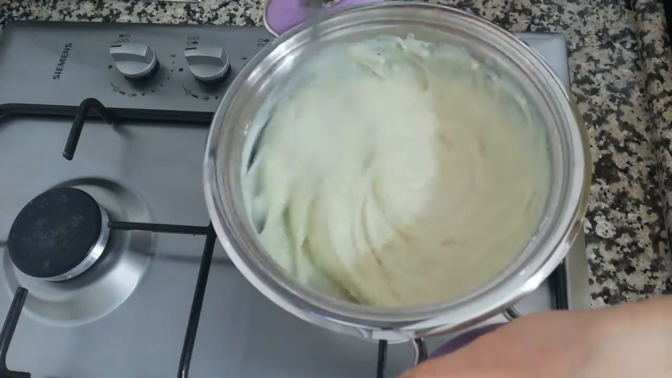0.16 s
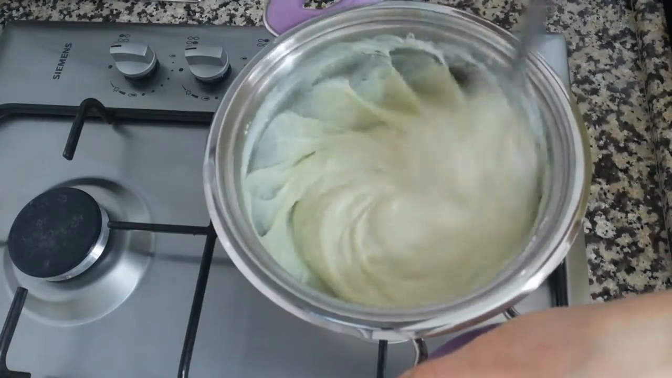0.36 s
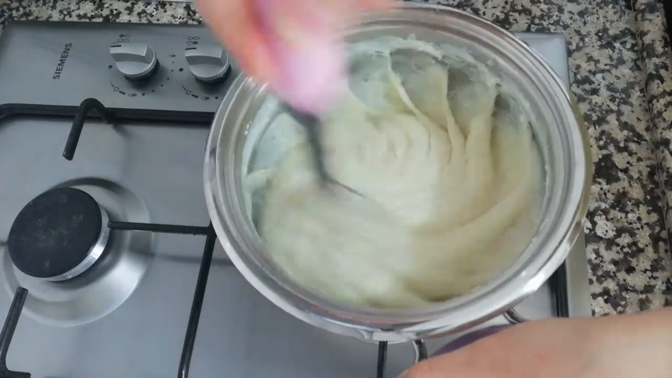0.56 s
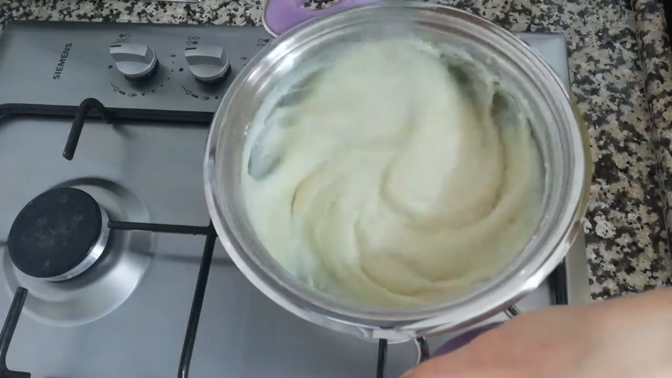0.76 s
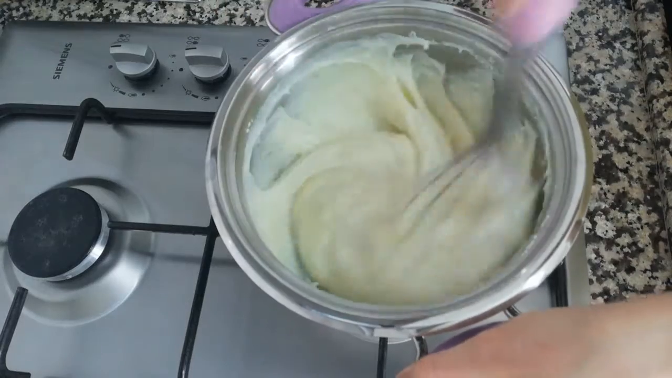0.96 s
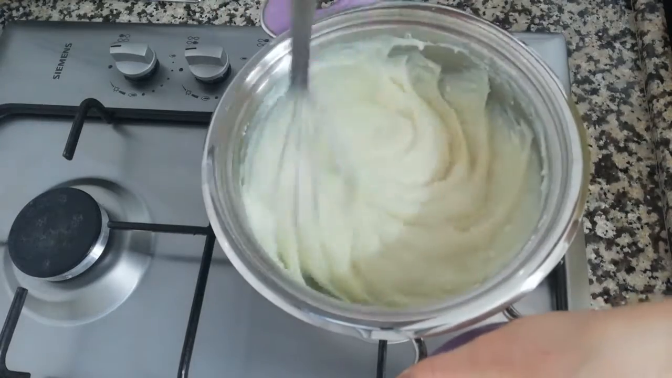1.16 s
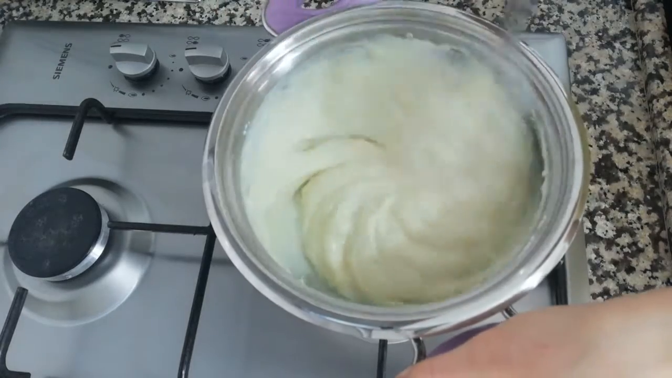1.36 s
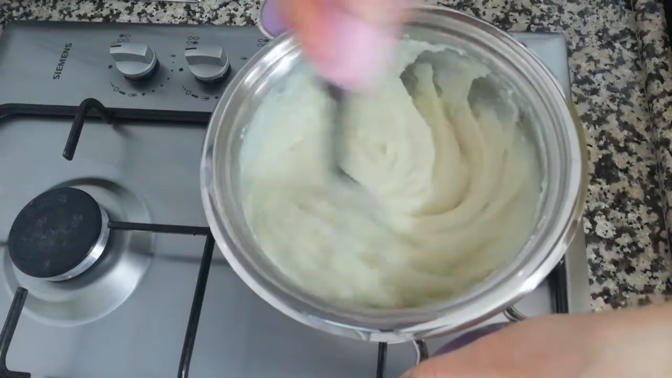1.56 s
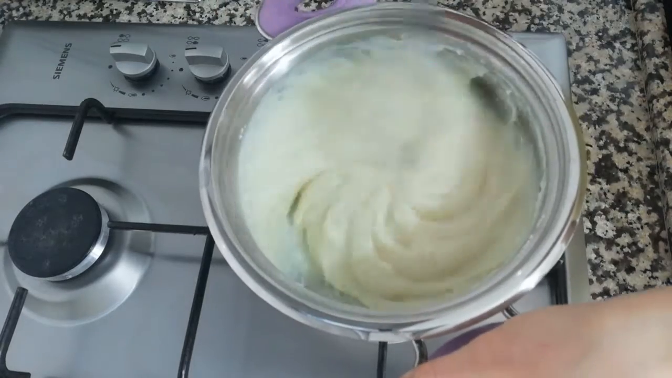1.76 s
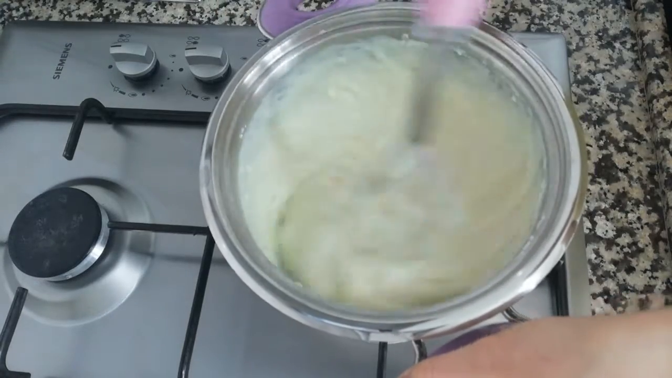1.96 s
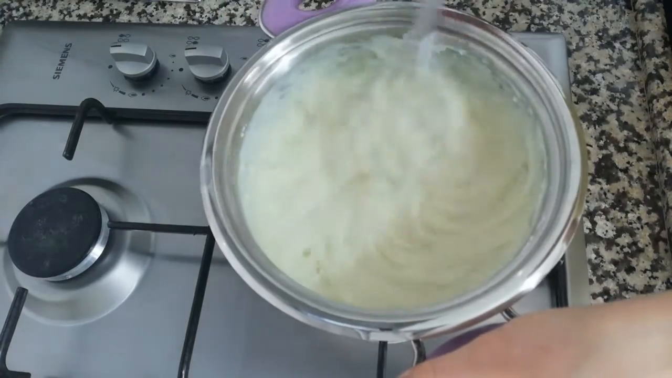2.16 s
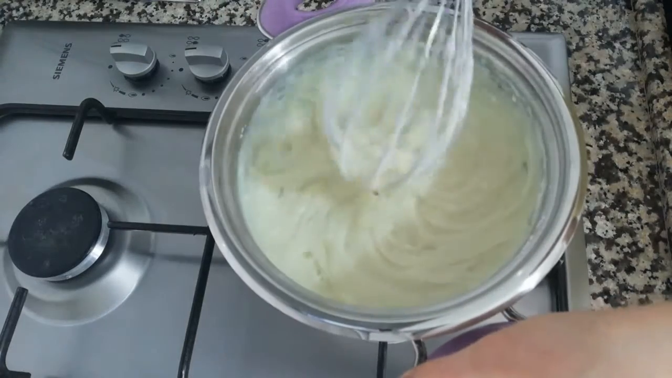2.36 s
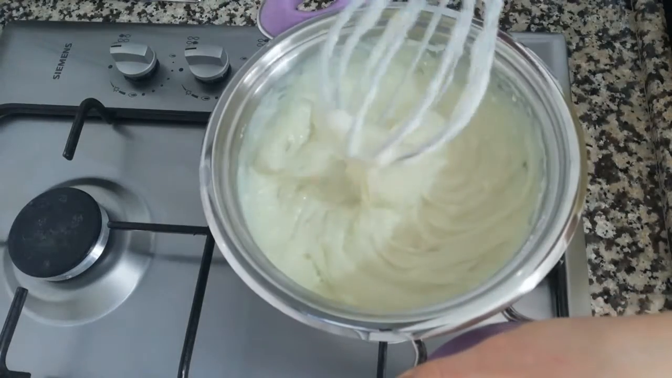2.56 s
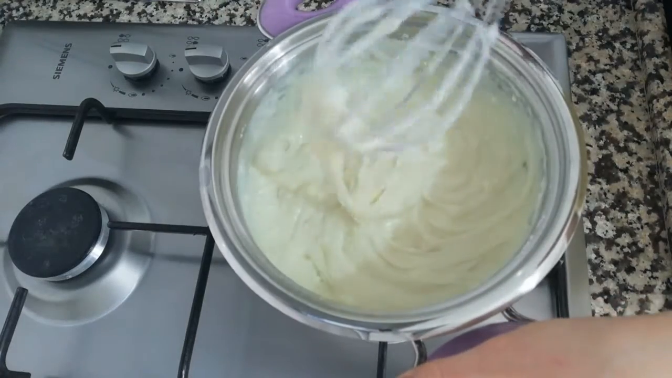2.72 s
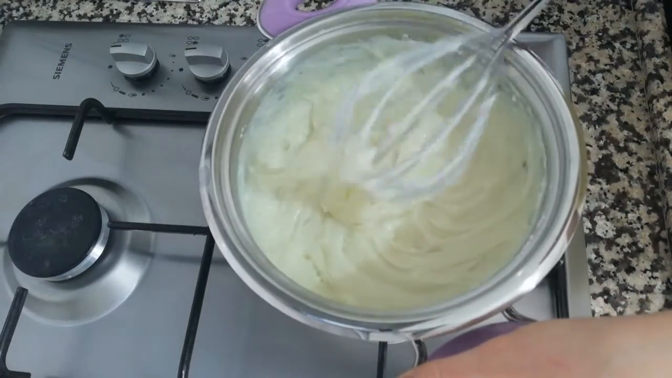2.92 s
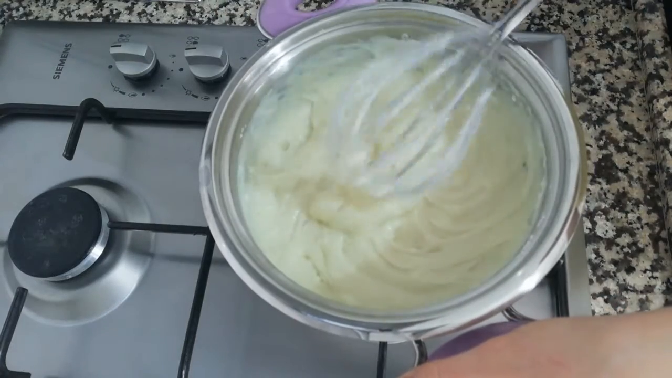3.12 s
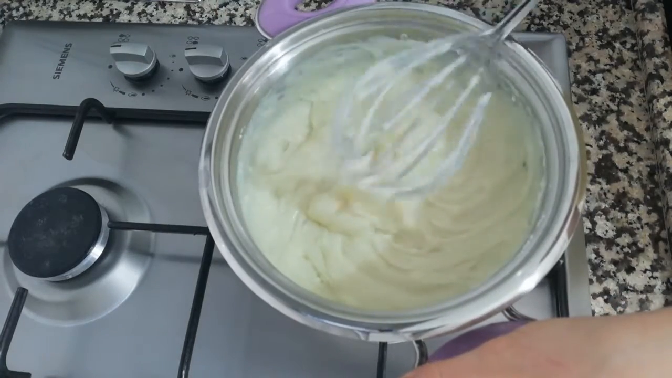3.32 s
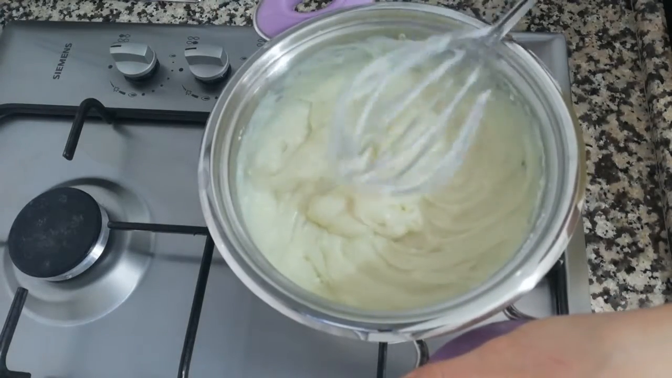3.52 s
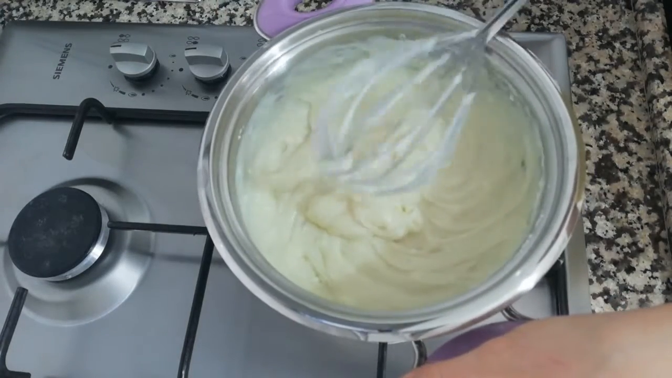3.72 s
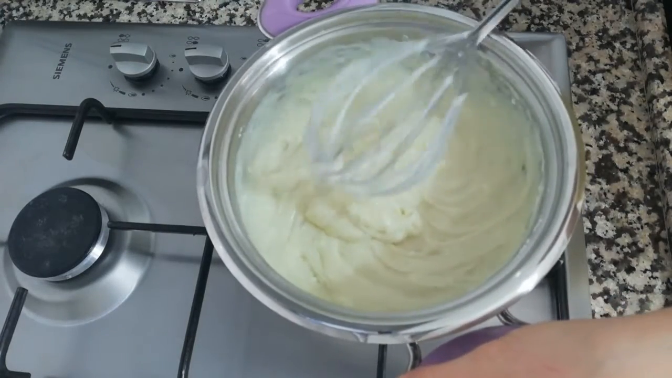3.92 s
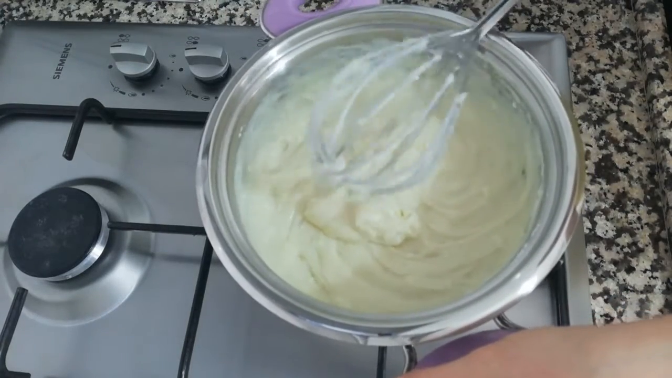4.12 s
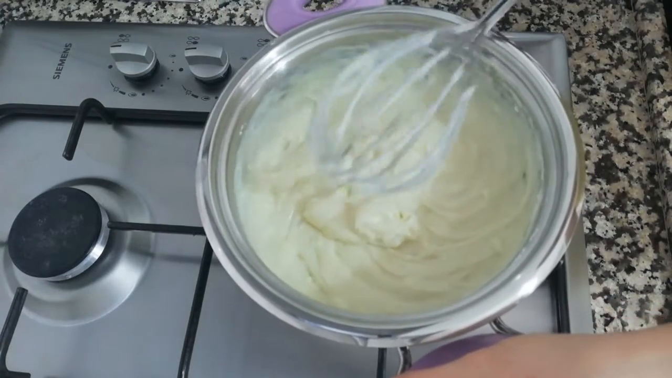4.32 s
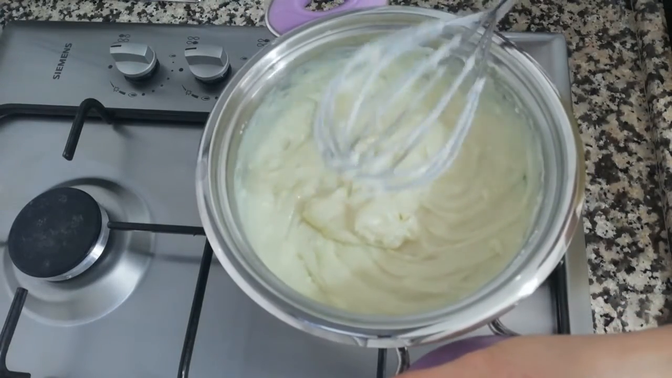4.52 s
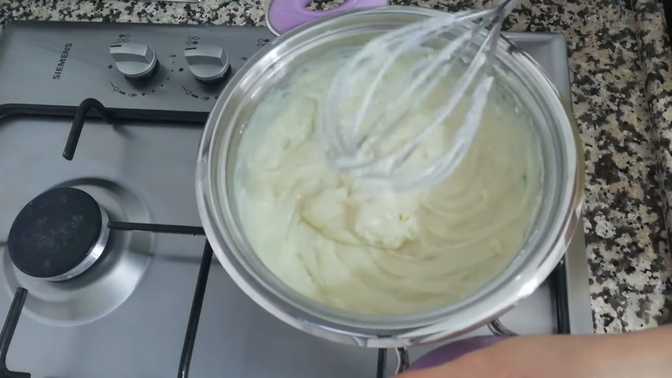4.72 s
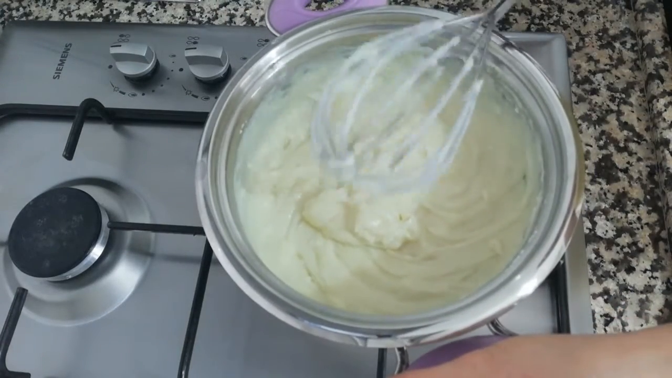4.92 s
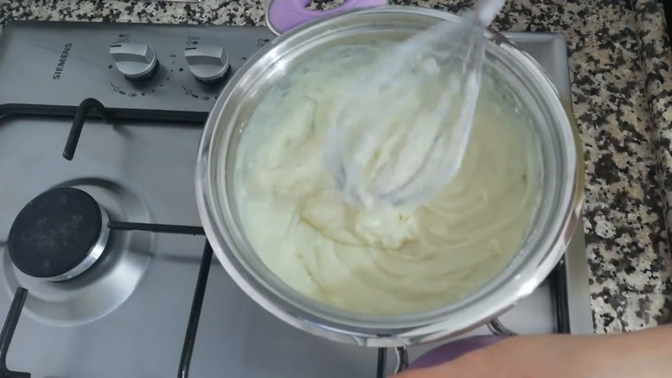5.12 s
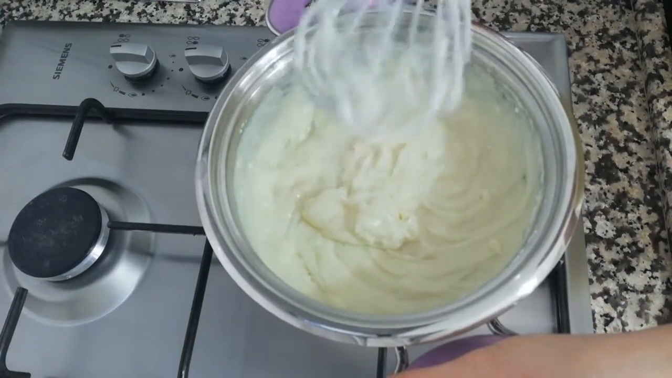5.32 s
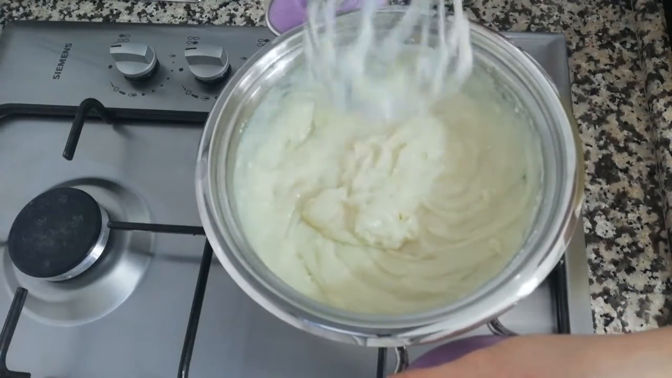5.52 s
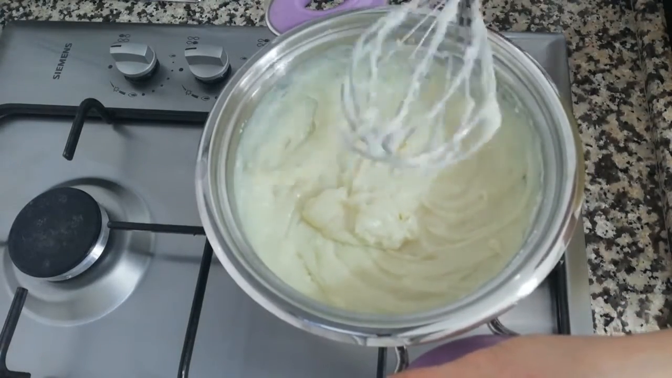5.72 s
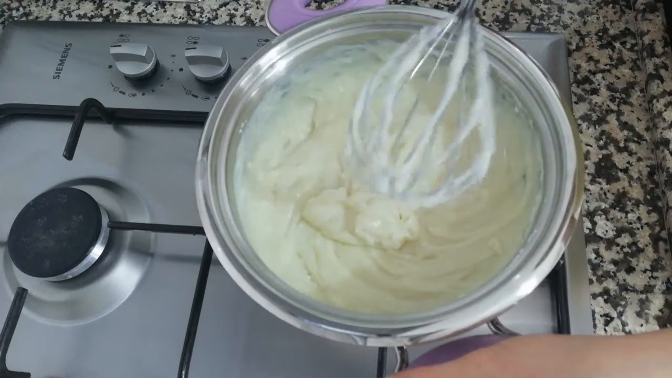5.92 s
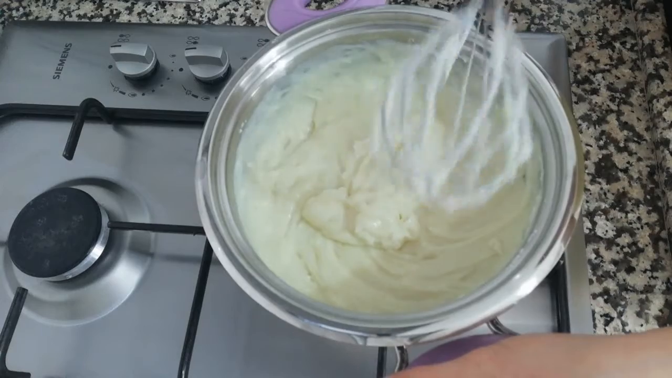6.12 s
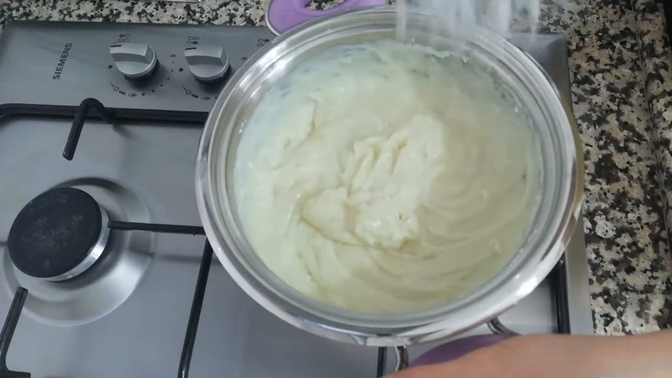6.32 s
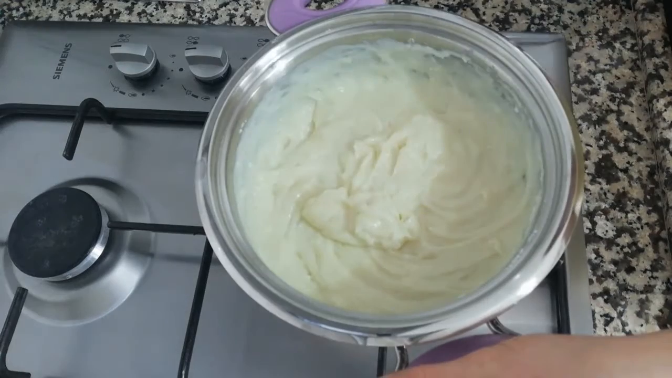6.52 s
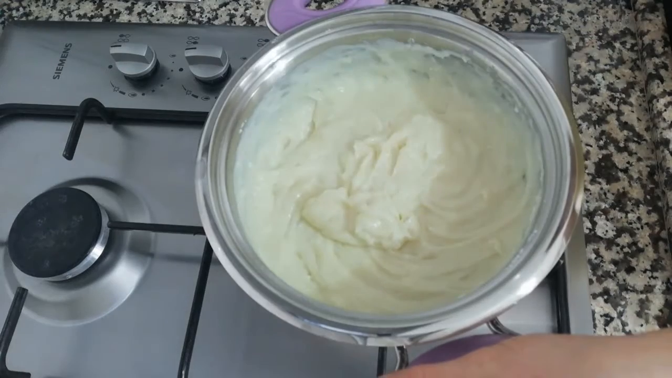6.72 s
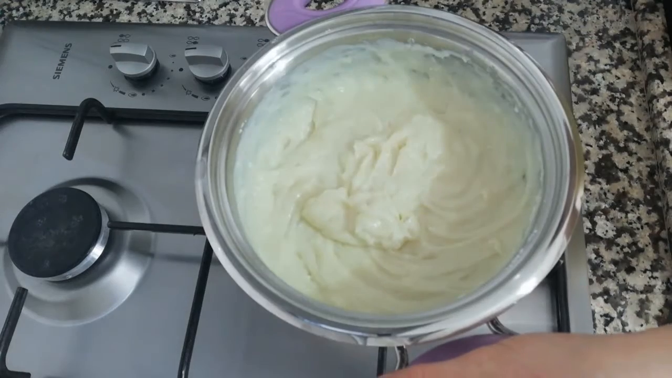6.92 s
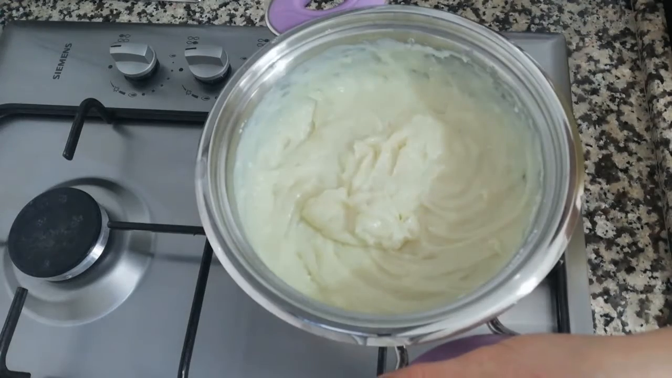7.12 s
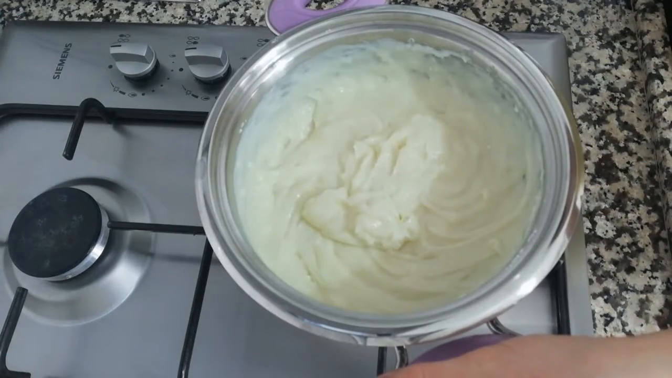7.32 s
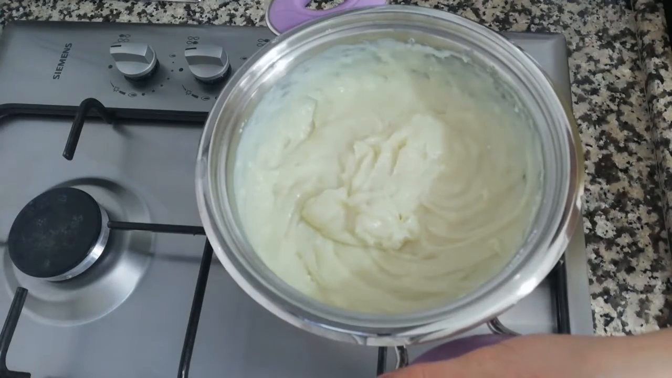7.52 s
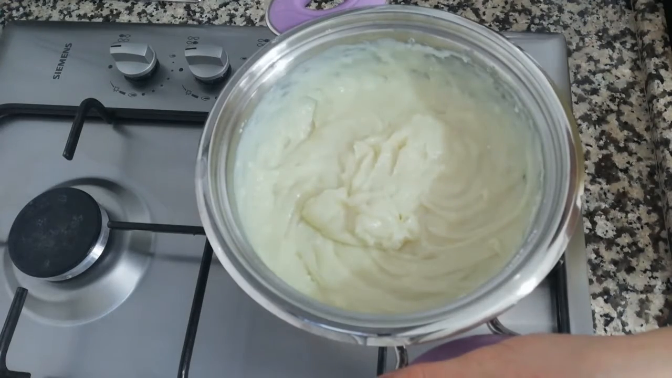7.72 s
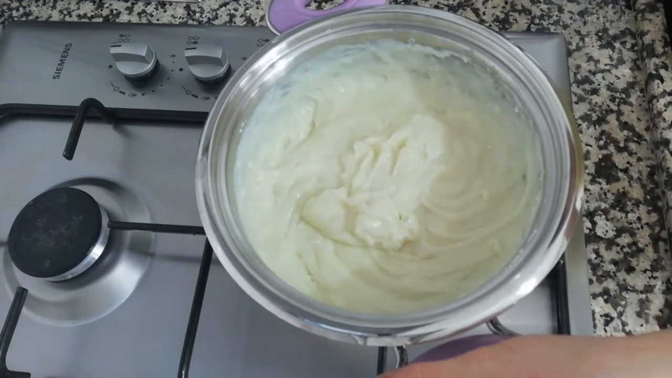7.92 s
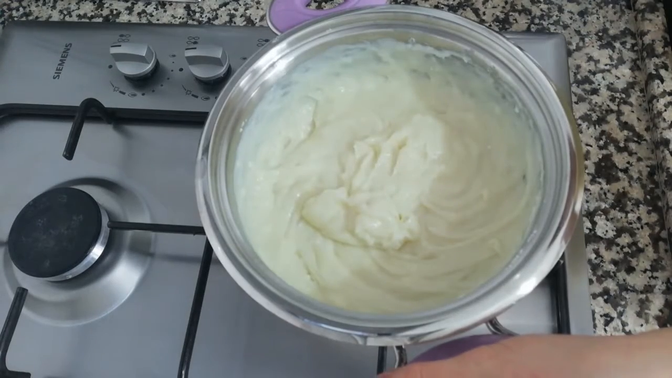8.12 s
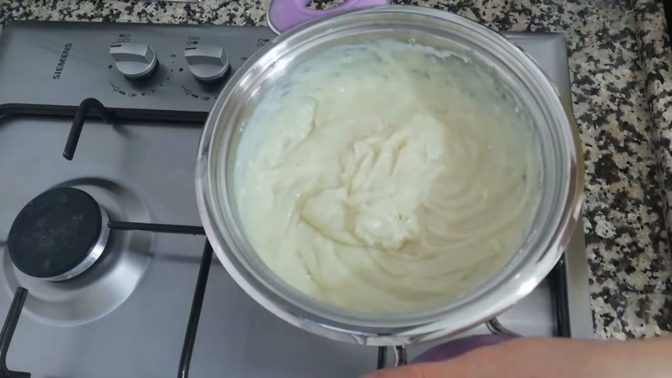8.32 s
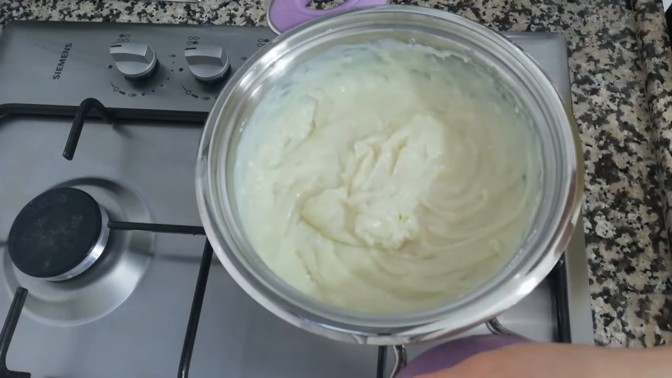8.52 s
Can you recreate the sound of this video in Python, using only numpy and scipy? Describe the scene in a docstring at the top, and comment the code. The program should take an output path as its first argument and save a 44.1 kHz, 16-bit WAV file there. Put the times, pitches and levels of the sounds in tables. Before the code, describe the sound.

Brisk wet whisking with scratchy wire sweeps in a metal pot, a pause, a run of sharp ringing taps on the rim, then small clacks.

```python
"""A small quiet kitchen: a wire whisk stirs thick pudding in a steel pot on a gas hob.
Its wires scrape the steel as noisy slips that excite spectra and resonances; air pockets plop as rising sines.
It is rapped on the rim sixteen times: inharmonic steel modes and buzz, then low hob modes, clunk and rattle.
Soft bumps accompany the stirring; small knocks and light rubs of filtered noise follow as it is put aside.
Behind lie a diffuse noise-tail reverb and still air with a low wavering hum."""
import sys
import numpy as np
from scipy import signal
from scipy.fft import rfft, irfft, next_fast_len
from scipy.io import wavfile

SR = 44100
rng = np.random.default_rng(int(sys.argv[2]) if len(sys.argv) > 2 else 0)


def unload_wav(signal):
    """Save mono or channel-first audio to the path in sys.argv[1] as 16-bit WAV at rate SR, clipped to [-1, 1]."""
    wavfile.write(
        sys.argv[1],
        SR,
        np.round(np.clip(np.atleast_2d(signal).T, -1, 1) * 32767).astype(np.int16),
    )


N = 382347
TIME = np.arange(N) / SR   # s

# Levels of events and layers are relative: the faders in the functions set the final mix.
# light ticks of wires catching and springing free: t/s, level/dB
CATCHES = [(0.1638, -16.5), (0.3094, -13), (0.4446, -18), (0.5008, -16.5), (0.5364, -27), (0.6494, -17),
           (0.8235, -16), (1.0344, -19), (1.1134, -16), (1.4755, -21.5), (1.511, -14), (8.034, -38.5),
           (8.327, -32.5), (8.4, -28.5)]
# sweeps of the wires along the steel: start t/s, length/s, wire hiss level/dB, pot wall ring level/dB
SWEEPS = [(0.036, 0.083, -43.5, -41.5), (0.12, 0.22, -33.5, -36.5), (.415, 0.049, -33.5, -35.5),
          (0.469, 0.23, -32.5, -29.5), (0.731, 0.1, -32.5, -34), (0.915, 0.24, -31, -32),
          (1.213, .16, -36.5, -36), (1.419, 0.018, -36, -40), (1.471, 0.19, -32.5, -31),
          (1.702, 0.097, -36.5, -37.5)]
SWEEP_ATTACK_S, SWEEP_T60_S = 0.01, 0.052
HISS_ARCH_DB, WALL_ARCH_DB = 5, 7.0   # the wires press hardest in mid-sweep: the ends are this much weaker
# the wires keep grazing the bottom under the first sweeps
GRAZE_S, GRAZE_HISS_DB, GRAZE_WALL_DB = 1.2, -40.5, -43.5
STIR_S = 1.85   # span of the wire notes
# churning of the pudding: t/s, level/dB
CHURN_LEVEL = [(0.0, -61.5), (0.32, -56.5), (0.388, -64), (0.594, -55), (0.948, -64.5), (1.226, -47.5),
               (1.574, -56.5), (1.682, -53), (1.86, -67)]
# the pot drags on the grate: level at heavy churning, and dB of drag per dB of churning
HEAVY_CHURN_DB, DRAG_DB, DRAG_GROWTH = -49.5, -56, 2.7
# larger air pockets opening behind the wires: t/s, level/dB, starting pitch f/Hz
PLOPS = [(0.171, -43, 844), (0.292, -38.5, 930), (0.323, -37.5, 887), (0.537, -36.5, 867),
         (0.6, -40.5, 1140), (0.628, -45, 814), (0.803, -42.5, 964), (1.002, -41, 980), (1.066, -37, 890),
         (1.118, -37, 860), (1.146, -39.5, 780), (1.586, -39, 806)]
# smaller pockets open at random, with this spread of pitch
SMALL_PLOP_DB, SMALL_PLOP_HZ, SMALL_PLOP_OCTAVES = -48, 898, 0.1

# whisk on the rim: t/s, landing, ring level/dB, brightness/(dB per octave), shove to the pot level/dB
RAPS = [(2.9646, "wires", -22.5, 0.5, -42.5), (3.1901, "wires", -26.5, 1.7, -45),
        (3.3879, "wires", -21.5, 0, -41.5), (3.5893, "wires", -21, .5, -41.5),
        (3.7947, "neck", -20.5, 0.5, -40), (3.998, "neck", -23, .3, -40.5), (4.18, "neck", -20, -4, -39),
        (4.3676, "neck", -21, -0.5, -42.5), (4.555, "neck", -23, -1, -43.5),
        (4.7387, "neck", -24, -0.7, -43), (4.9191, "neck", -24.5, 2.5, -43),
        (5.1059, "neck", -22, -1.2, -39.5), (5.7266, "glancing", -26, -3.5, -50),
        (5.9138, "glancing", -26, 0, -43), (6.0731, "glancing", -26.5, 0.1, -44.5),
        (6.2974, "glancing", -25, -0.8, -57)]
# registers of the ring: low f/Hz, high f/Hz
RING_BANDS = [(2500, 3400), (3400, 5300), (5300, 8000), (8000, 11500), (11500, 17000)]
# the pot radiates each register in its own direction: left over right level/dB
RING_LEFT_DB = (1.9, 3, 3, 1.2, 4)
# colour of the ring for each landing: level/dB in each register
RING_COLOUR = {"wires": (-1.5, -2, 0.2, 4.0, -10.5), "neck": (-9, -12.5, 0.14, -1.3, -3),
               "glancing": (-4, -2, -0.1, -1, -10.5)}
# contact tick for each landing: level/dB over the ring
TICK_DB = {"wires": 14, "neck": 21, "glancing": 27.5}
# rocking of the pot for each landing: level/dB at a firm shove
ROCKING_DB = {"wires": -41.5, "neck": -49, "glancing": -44.5}
FIRM_SHOVE_DB, ROCKING_GROWTH = -41.5, 1.6   # growth is dB of rocking per dB of shove
# wall note of the pot for each landing: level/dB over the shove
WALL_NOTE_DB = {"wires": -14, "neck": -15.5, "glancing": 6}
# wall modes of the pot, rung mostly by glancing raps: f/Hz, level/dB, T60/s, delay t/s
WALL_MODES = [(1444, 0.5, .061, .002), (620, -8.5, 0.14, 0.02)]
# rebounds after a rap: delay t/s, pot clunk level/dB, wire rattle level/dB
ROCKING = [(.002, -11.5, 0), (.019, 3.5, -1.5), (0.043, -3.5, -11.5), (.087, -7.5, -9.5)]
RATTLE_DB = -1   # rattle and thock over the shove
# wires lying on the rim are stilled sooner than those swinging free: rattle fade/(dB per s) for each landing
RATTLE_FADE_DB_PER_S = {"wires": 76, "neck": 1.5, "glancing": 84.5}
# hob top under the pot: f/Hz, level/dB, T60/s
HOB = [(39.8, 1.5, 0.74), (49.87, 0, 1), (83, -3, 0.94), (99.5, -4.5, 0.41), (126, -8, 0.57),
       (132.7, -5.5, 0.44), (149.5, -5.5, 0.75), (172.5, 0.5, 0.26), (195, -10.5, 0.41),
       (251.2, -10.5, 0.059), (293, -9, 0.13), (378, -29, 0.43), (432, -12, .45)]

# dull bumps of pot and hob: t/s, thud level/dB, knock level/dB
BUMPS = [(0.248, -49, -51.5), (0.782, -70, -52.5), (1.311, -47, -49), (1.499, -52.5, -53),
         (7.469, -41.5, -56), (7.492, -56.5, -67), (8.327, -47, -57.5)]
# small knocks as things are moved and set down: t/s, level/dB
CLACKS = [(2.395, -48), (6.921, -46), (6.948, -47), (7.031, -36), (7.055, -29.5), (7.515, -38.5)]
# light rubs: start t/s, length/s, hiss level/dB, metal slide level/dB, body level/dB
RUB_STROKES = [(7.367, 0.03, -66.5, -65, -64), (7.432, 0.042, -63, -53, -70), (7.503, 0.039, -93, -88, -52),
               (7.79, .09, -87, -88, -60.5), (7.889, 0.08, -70, -82, -62), (8.012, 0.093, -71, -64.5, -79),
               (8.367, 0.047, -57, -78, -67), (8.406, 0.092, -57.5, -80, -63.5)]
RUB_ATTACK_S, RUB_T60_S, RUB_SAG_DB_PER_S = 0.019, 0.097, 47

# spectrum of wires on steel: f/Hz, level/dB
WIRE_HISS = [(3240, -59), (5500, -4), (7420, 0), (9200, 7.5), (10700, 7.5), (15200, -13.5), (16200, -92),
             (16500, -51)]
# spectrum of the scraped pot wall: f/Hz, level/dB
WALL_RING = [(1290, -27), (2200, -9.5), (2580, -8), (2960, 1), (3210, -3.5), (3590, 4), (4350, 1),
             (4590, 1.5), (7000, -19), (9100, -35), (15400, -120)]
# spectrum of churning pudding: f/Hz, level/dB
CHURN = [(100, -16), (280, -12), (400, -4.5), (700, -1), (1050, 1), (1500, 2), (2400, 2.5), (3000, -7),
         (4000, -5), (6600, -70)]
# spectrum of the buzz in a rap: f/Hz, level/dB
CRACK = [(900, -48), (2300, -20), (2900, -12.5), (3700, -7.5), (5100, -21.5), (6100, 4.5), (8000, -4.5),
         (10300, 5), (11200, -1), (12400, 9.5), (14800, -1.5), (16500, -20)]
# spectrum of a small knock: f/Hz, level/dB
CLACK = [(210, -39), (350, -7), (801, 0.5), (1290, -4.5), (1630, 0.5), (3730, -12), (4330, -14),
         (5480, -23), (9060, -11.5), (12000, -24), (15600, -61), (22000, -120)]
# spectrum of the rubbing hiss: f/Hz, level/dB
RUB_HISS = [(880, -52), (1500, -14), (1930, -8), (2600, -13.5), (4260, -13), (9500, -1.5), (14900, -3),
            (15900, -15), (16500, -36)]
# spectrum of the still air: f/Hz, level/dB
AIR = [(12, -42), (20, -4), (96, -3.5), (165, -13), (351, -15), (440, -14.5), (506, -20.5), (729, -16),
       (2310, -21), (3140, -22), (3420, -21.5), (7950, -27.5), (10500, -26), (15200, -35.5), (16500, -51)]
AIR_DB = -61.5

# resonances of pot and whisk: f/Hz, width/Hz, level/dB
STEEL = [(2704, 16, -5), (2870, 48, -1.5), (3140, 36, -6), (3350, 38, -10), (3554, 71, -16),
         (3674, 130, -12.5), (4285, 23, -12), (4730, 37, -17.5), (5970, 15, -19), (5760, 14, -5),
         (6070, 46, 3.5), (6500, 120, -1.5), (6630, 250, -4), (7140, 61, -7), (7970, 90, -9.5),
         (7940, 40, -27.5), (8720, 200, 0), (9500, 350, -2.5), (10300, 52, 9.5), (10600, 80, 2),
         (11950, 90, -1.5), (12320, 62, 6.5), (13500, 180, -3), (14320, 160, 3.5), (15520, 100, -9)]
# resonances of the hollow of the pot: f/Hz, width/Hz, level/dB
POT_HOLLOW = [(840, 71, 3.5), (890, 114, 17.5)]
# resonances of the grate under the dragging pot: f/Hz, width/Hz, level/dB
GRATE_DRAG = [(146, 11, 0.5), (197, 14, 6.5), (236, 8.8, 2), (340, 17, 1)]
# resonances of the rocking pot: f/Hz, width/Hz, level/dB
POT_CLUNK = [(257.7, 10, -5.5), (320, 40, -1.5), (372.7, 47, 5.5), (436.4, 14, 3.5), (537, 97, 1),
             (616, 37, 3), (793, 39, 0), (865, 50, -2)]
# resonances of the rattling wires: f/Hz, width/Hz, level/dB
WIRE_RATTLE = [(1920, 370, -9), (1924, 120, 1.5), (2290, 130, -6), (3200, 450, 2), (4040, 980, -3.5),
               (9400, 1800, -3)]
# resonances of a dull thud: f/Hz, width/Hz, level/dB
THUD = [(146, 92, 1), (168, 33, 12), (228, 83, -12)]
# resonances of a dull knock: f/Hz, width/Hz, level/dB
KNOCK = [(384, 19, 6), (507, 250, -9.5), (650, 380, -3.5)]
# resonances of what is set down: f/Hz, width/Hz, level/dB
CLACK_RING = [(633, 110, 6.5), (796, 43, -48), (1140, 70, -2), (1780, 84, -2), (1922, 120, -1),
              (2900, 98, 0), (3210, 45, -21), (4210, 57, 6), (6840, 80, -15), (7600, 120, -16)]
# resonances of sliding metal: f/Hz, width/Hz, level/dB
METAL_SLIDE = [(4040, 260, -4), (4400, 120, -5), (6770, 200, -7), (7530, 170, -1.5), (9050, 350, -12),
               (11800, 600, -6)]
# resonances of the rubbed body: f/Hz, width/Hz, level/dB
RUB_BODY = [(462, 12, 0.5), (650, 120, -11), (974, 83, -4), (1340, 20, -3)]

# likeness of the left and right channels: f/Hz, likeness from 0 to 1
LIKENESS = [(60, 0.91), (150, 0.95), (300, 0.12), (700, .15), (2000, .15), (10000, 0.017)]
# reverberation of the kitchen: f/Hz, T60/s
KITCHEN = [(150, 0.82), (600, 0.39), (3000, 0.4), (6000, 0.34), (10000, 0.29), (16000, 0.13)]
CUTOFF_HZ = 16800


def stirring():
    """Wires stick and slip over the steel, ringing wall and hollow, while the pudding churns."""
    hiss, wall = wire_contact()
    churn, = gains_in_time(CHURN_LEVEL)
    passing = from_db(0.86 * drift(41))   # wire after wire touches down
    slips = friction(per_s=500, spread_db=6.0, smooth=1.0) * passing
    scrape = rms_one(slips) + from_db(-0.5) * wire_notes() * passing
    wires = from_db(-3.5) * hiss * coloured(scrape, WIRE_HISS)
    catches = from_db(-11.5) * blows(CATCHES, t60=0.063) * coloured(noise(), WIRE_HISS)

    wall_hiss = from_db(-9.0) * coloured(scrape, WALL_RING)
    steel_ring = from_db(-23.0) * resonate(slips, STEEL)
    pot = wall * (wall_hiss + steel_ring)
    hollow = from_db(-23.5) * hiss * resonate(slips, POT_HOLLOW) + from_db(12) * plops()
    squelch = friction(per_s=500, spread_db=4.5, smooth=1.0)
    pudding = from_db(3.5) * churn * coloured(squelch, CHURN)
    drag_gain = from_db(DRAG_DB) * (churn / from_db(HEAVY_CHURN_DB)) ** DRAG_GROWTH
    drag = drag_gain * resonate(noise()[0], GRATE_DRAG)
    return (wires + catches) * pan(-0.047) + (pot + hollow + pudding + drag) * pan(1.0)


def wire_contact():
    """Gains of wire hiss and wall ring: light grazing, and an arch of pressure in each sweep."""
    graze = stroke(0, GRAZE_S, SWEEP_ATTACK_S, SWEEP_T60_S)
    hiss = from_db(GRAZE_HISS_DB) * graze
    wall = from_db(GRAZE_WALL_DB) * graze
    for start, length, hiss_db, wall_db in SWEEPS:
        touch = stroke(start, length, SWEEP_ATTACK_S, SWEEP_T60_S)
        slack = 1 - np.sin(np.pi * np.clip((TIME - start) / length, 0, 1))
        hiss = np.maximum(hiss, touch * from_db(hiss_db - HISS_ARCH_DB * slack))
        wall = np.maximum(wall, touch * from_db(wall_db - WALL_ARCH_DB * slack))
    return hiss, wall


def wire_notes(per_s=900, t60=0.065, size=3000):
    """Each touch stops a wire at a new length, so it rings briefly at a pitch of its own."""
    count = int(per_s * STIR_S)
    out = np.zeros((2, N))
    shape = dying(t60, size) * (1 - dying(0.014, size))
    for when, pitch, left, right in rng.random((count, 4)):
        hz = 2000 + 14000 * pitch
        cycles = hz * TIME[:size] + np.array([[left], [right]])
        add(out, when * STIR_S, shape * np.sin(2 * np.pi * cycles))
    return out / np.std(out[:, :int(STIR_S * SR)])


def plops(t60=0.028, glide=0.63, size=4000, count=10):
    """An air pocket rings in the hollow of the pot, rising a little as it opens."""
    out, t = np.zeros((2, N)), TIME[:size]
    times = (np.arange(count) + rng.random(count)) / count * SWEEPS[-1][0]
    pockets = list(PLOPS)
    for s in times:
        hz = SMALL_PLOP_HZ * 2 ** (SMALL_PLOP_OCTAVES * rng.standard_normal())
        pockets.append((s, SMALL_PLOP_DB, hz))
    shape = dying(t60, size) * (1 - dying(0.027, size))
    for s, db, hz in pockets:
        phase = 2 * np.pi * hz * t * (1 + glide * t) + rng.normal(0, 1.0, (2, 1))
        add(out, s, from_db(db) * shape * np.sin(phase))
    return out


def raps(size=6000):
    """The landing colours the ring; each rap's own brightness tilts it towards high or low registers."""
    out = np.zeros((2, N))
    octaves = np.log2(RING_BANDS).mean(1)
    for s, landing, ring_db, brightness, shove_db in RAPS:
        levels = ring_db + np.array(RING_COLOUR[landing]) + brightness * (octaves - octaves.mean())
        struck = rim_ring(size)
        ring = 0
        for db, left_db, edges in zip(levels, RING_LEFT_DB, RING_BANDS):
            ring = ring + from_db(db) * pan(left_db) * rms_one(band(struck, *edges))
        tick = dying(0.0013, size) * rms_one(band(noise(size), 5700, 14000, order=1))
        tick = from_db(ring_db + TICK_DB[landing]) * tick
        # the pot wall gives way
        thock = dying(0.1, size) * rms_one(band(noise(size), 1200, 2600, order=2))
        thock = from_db(shove_db + RATTLE_DB) * thock
        contact = from_db(-13.0) * tick + from_db(-5.0) * thock
        add(out, s, from_db(-11.5) * ring + contact * pan(3.2))
    return out


def rim_ring(size, t60_times_width=1.7, scatter_db=2.5, detune=.007, spread_s=0.0019):
    """Steel modes damped by the pudding, with the buzz of several wires landing within milliseconds."""
    hz, width, db = np.transpose(STEEL)[:, :, None]
    hz = hz * (1 + detune * rng.standard_normal(hz.shape))
    strength = from_db(db + scatter_db * rng.standard_normal(db.shape)) * width
    phase = rng.uniform(0, 2 * np.pi, (2,) + hz.shape)
    swell = 1 - np.exp(-TIME[:size] * hz / 6)   # low bending waves take longer to spread round the pot
    tone = np.sin(2 * np.pi * hz * TIME[:size] + phase)
    modes = (strength * swell * dying(t60_times_width / width, size) * tone).sum(1)

    contacts = ((1 + from_db(-3.5)) * dying(0.06, size))[None]
    for lag in rng.exponential(spread_s, size=3):
        add(contacts, lag, from_db(-12.5) * dying(0.034, size)[None])
    buzz = coloured(noise(size), CRACK) * contacts
    return rms_one(modes) + from_db(-3.0) * rms_one(buzz)


def wall_note():
    """Each rap rings two wall modes of the pot, quickly damped by the pudding."""
    out = 0
    for hz, db, t60, delay in WALL_MODES:
        strikes = [(s + delay, shove_db + WALL_NOTE_DB[landing] + db)
                   for s, landing, _, _, shove_db in RAPS]
        tone = np.sin(2 * np.pi * hz * TIME + rng.uniform(0, 2, (2, 1)))
        out = out + blows(strikes, t60) * tone
    return out * pan(2.5)


def hob():
    """Each rap swings the sheet-steel hob, rocks the pot on its grate and leaves the wires rattling."""
    return hob_swing() + pot_rocking() + wire_rattle()


def hob_swing(size=30000, scatter_db=2.0, detune=0.02):
    """The shove sets low modes of the hob top swinging, each with its own decay."""
    out = np.zeros((2, N))
    hz, db, t60 = np.transpose(HOB)[:, :, None]
    for s, *_, shove_db in RAPS:
        strength = from_db(shove_db + db + scatter_db * rng.standard_normal(db.shape))
        seated_hz = hz * (1 + detune * rng.standard_normal(hz.shape))   # the pot settles differently each time
        swing = np.sin(2 * np.pi * seated_hz * TIME[:size] + rng.uniform(0, 2 * np.pi, hz.shape))
        modes = (strength * dying(t60, size) * swing).sum(0)[None]
        add(out, s, modes * (1 - dying(0.033, size)))
    return out


def pot_rocking():
    """The pot rebounds on its grate, and each rebound excites its clunk resonances."""
    strikes = []
    for s, landing, _, _, shove_db in RAPS:
        rock_db = ROCKING_DB[landing] + ROCKING_GROWTH * (shove_db - FIRM_SHOVE_DB)
        strikes += [(s + lag, rock_db + db) for lag, db, _ in ROCKING]
    clunk = blows(strikes, t60=0.11) * resonate(noise(), POT_CLUNK)
    return from_db(1.5) * clunk * pan(0.76)


def wire_rattle():
    """The rebounds shake the wires, which fall still at a rate set by the landing."""
    strikes = []
    for s, landing, _, _, shove_db in RAPS:
        for lag, _, db in ROCKING:
            fade_db = RATTLE_FADE_DB_PER_S[landing] * lag
            strikes.append((s + lag, shove_db + RATTLE_DB + db - fade_db))
    rattle = blows(strikes, t60=0.077) * resonate(noise(), WIRE_RATTLE)
    return from_db(7.0) * rattle * pan(4.0)


def handling():
    """Soft bumps, small knocks and light rubbing of metal and hand, as noise through resonances."""
    thud_gain = blows([(s, thud) for s, thud, _ in BUMPS], t60=0.19)
    thuds = from_db(-1.5) * thud_gain * resonate(noise()[0], THUD)
    knock_gain = blows([(s, knock) for s, _, knock in BUMPS], t60=0.12)
    knocks = from_db(5) * knock_gain * resonate(noise(), KNOCK)
    clack = from_db(-9.5) * (coloured(noise(), CLACK) + resonate(noise(), CLACK_RING))
    clacks = blows(CLACKS, t60=0.057) * clack
    return thuds + knocks + clacks * pan(2.7) + rubbing() * pan(1.9)


def rubbing():
    """One stream of tiny slips drives hiss, sliding metal and body resonances."""
    hiss, slide, body = rub_contact()
    slips = friction(per_s=260, spread_db=5.5, smooth=1.0)
    rubs = from_db(7.5) * hiss * coloured(slips, RUB_HISS)
    rubs = rubs + from_db(2.0) * slide * resonate(slips, METAL_SLIDE)
    return rubs + from_db(0.5) * body * resonate(slips, RUB_BODY)


def rub_contact():
    """Gains of hiss, metal slide and body: each rub starts firmly and eases off."""
    gains = 0
    for start, length, *levels_db in RUB_STROKES:
        easing = from_db(-RUB_SAG_DB_PER_S * np.clip(TIME - start, 0, length))
        touch = stroke(start, length, RUB_ATTACK_S, RUB_T60_S)
        gains = gains + np.outer(from_db(levels_db), easing * touch)
    return gains


def kitchen(x, size=26000):
    """Diffuse reflections off tiles and counter: noise bands whose decay is longest in the bass."""
    edges = np.geomspace(190, 17000, 9)
    tail = 0
    for low, high in zip(edges, edges[1:]):
        t60 = at_hz(KITCHEN, np.sqrt(low * high))
        tail = tail + band(noise(size), low, high) * dying(t60, size)
    tail = rms_one(tail * (1 - dying(0.0093, size))) / np.sqrt(size)
    return signal.fftconvolve(x, tail, axes=1)[:, :N]


def room_tone():
    """Still air as slowly drifting noise, with a low wavering hum from a narrow resonance."""
    hum = resonate(noise()[0], [(94.3, 5.6, 0)])
    air = from_db(AIR_DB) * coloured(noise(), AIR) * from_db(0.82 * drift(3))
    return air + from_db(-71) * hum


def from_db(db):
    """Decibels to gain."""
    return 10 ** (np.asarray(db) / 20)


def rms_one(x):
    """Scale to rms 1."""
    return x / np.sqrt(np.mean(x ** 2) + 1e-20)


def pan(left_db):
    """Gains of the two channels, left over right by this many dB."""
    return from_db([[left_db / 2], [-left_db / 2]])


def at_hz(points, hz):
    """Read a table on a log-frequency axis."""
    f, value = np.transpose(points)
    return np.interp(np.log(np.maximum(hz, 1)), np.log(f), value)


def gains_in_time(rows):
    """Level columns as gain curves that fade out beyond their ends."""
    s, *columns = np.transpose(rows)
    gate = np.interp(TIME, [s[0] - .01, s[0], s[-1], s[-1] + .02], [0, 1, 1, 0])
    return [gate * from_db(np.interp(TIME, s, c)) for c in columns]


def stroke(start, length, attack, t60):
    """Envelope that rises, holds and dies away."""
    t = TIME - start
    return np.clip(t / attack, 0, 1) * from_db(-60 * np.clip((t - length) / t60, 0, 2))


def dying(t60, size):
    """Exponential decay from 1."""
    return 1000 ** (-TIME[:size] / t60)


def blows(rows, t60):
    """Envelope that jumps at each (s, dB) and dies away."""
    kicks = np.zeros(N)
    for s, db in rows:
        kicks[int(s * SR)] += from_db(db)
    return signal.lfilter([1], [1, -1000 ** (-1 / (t60 * SR))], kicks + 1e-18)


def drift(rate):
    """Smooth random curve of rms 1: noise low-passed at a rate in Hz, drawn every 40 samples."""
    r = np.exp(-80 * np.pi * rate / SR)
    draws = rng.standard_normal(N // 40 + 2002)
    slow = signal.lfilter([1], [1, -2 * r, r * r], draws)[2000:]   # skip the filter's start-up
    return np.interp(np.arange(N) / 40, np.arange(len(slow)), rms_one(slow))


def noise(size=N):
    """White noise, one for each microphone."""
    return rng.standard_normal((2, size))


def friction(per_s, spread_db, smooth):
    """Tiny slips of uneven size over a smooth hiss."""
    sizes = from_db(spread_db * np.minimum(rng.exponential(1, N), 4))
    slips = (rng.random(N) < per_s / SR) * sizes
    grip = signal.lfilter([1], [1, -np.exp(-1 / (.0004 * SR))], slips)   # decay time constant 0.4 ms
    return noise() * (rms_one(grip) + smooth)


def coloured(x, spectrum):
    """Give two unrelated signals a spectrum; the microphones agree in the bass. Rms 1."""
    size = next_fast_len(x.shape[1])
    hz = np.arange(size // 2 + 1) * SR / size
    alike = np.clip(at_hz(LIKENESS, hz), 0, 1)
    both = rfft(x, size)
    both = np.sqrt(1 + alike) * both[0] + np.sqrt(1 - alike) * both[1] * [[1], [-1]]
    return rms_one(irfft(both * from_db(at_hz(spectrum, hz)), size)[:, :x.shape[1]])


def resonate(x, resonances):
    """Parallel resonances, dark beyond the outermost ones; rms 1."""
    out = 0
    for hz, width, db in resonances:
        r = np.exp(-np.pi * width / SR)
        poles = [1, -2 * r * np.cos(2 * np.pi * hz / SR), r * r]
        out = out + from_db(db) * (1 - r * r) * signal.lfilter([1, 0, -1], poles, x)
    return rms_one(band(out, .75 * resonances[0][0], 1.25 * resonances[-1][0], order=2))


def band(x, low, high, order=3):
    """Causal band-pass."""
    return signal.sosfilt(signal.butter(order, [low, high], "band", fs=SR, output="sos"), x)


def add(out, s, sound):
    """Mix a sound in at a time."""
    start = max(int(s * SR), 0)
    part = out[:, start:start + sound.shape[1]]
    part += sound[:, :part.shape[1]]


def scene():
    """Pot close to the microphones, the counter a little farther off and so sent more to the room."""
    stir, rap, stove, aside = stirring(), raps() + wall_note(), hob(), handling()
    send = from_db(-9.0) * stir + from_db(-12.0) * rap + from_db(-8) * stove + from_db(-3.0) * aside
    return stir + rap + stove + aside + kitchen(send) + room_tone()


def record(dry):
    """The top is cut steeply."""
    return signal.sosfilt(signal.ellip(10, .2, 80, CUTOFF_HZ, fs=SR, output="sos"), dry)


dry = scene()
out = record(dry)
unload_wav(out)
```